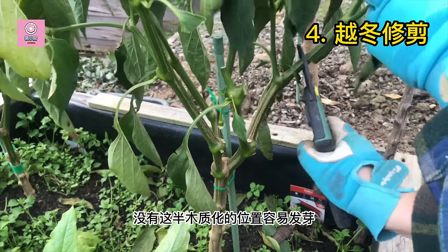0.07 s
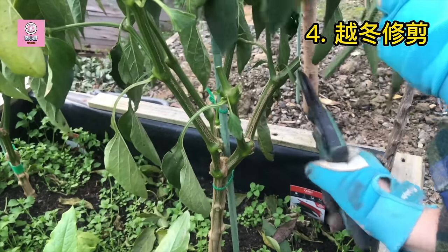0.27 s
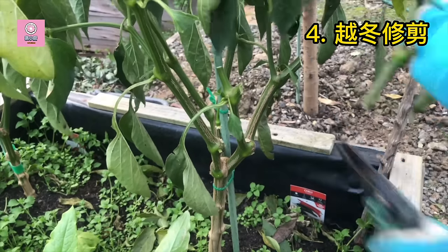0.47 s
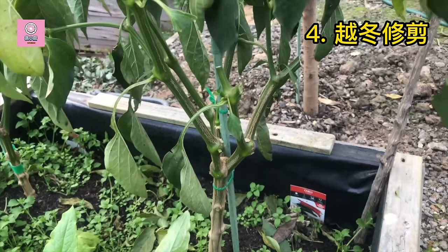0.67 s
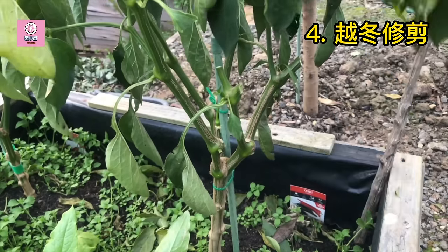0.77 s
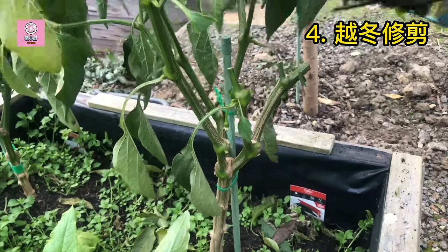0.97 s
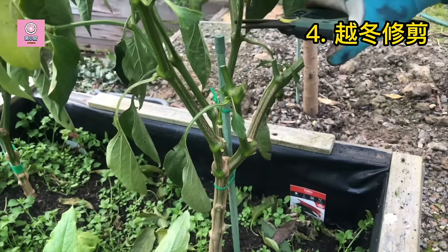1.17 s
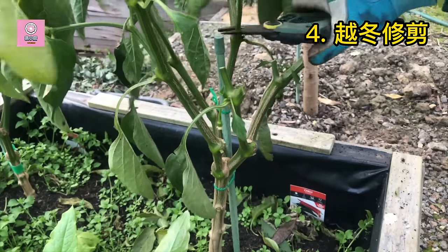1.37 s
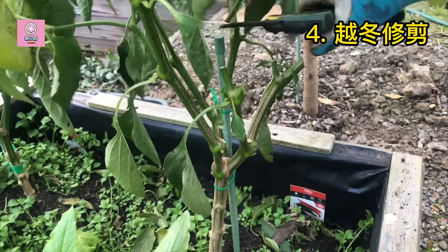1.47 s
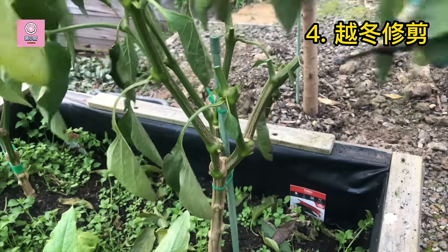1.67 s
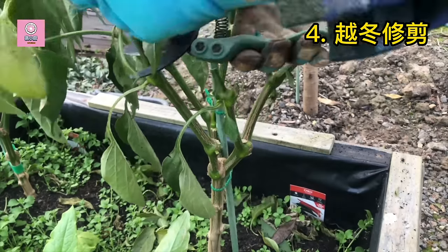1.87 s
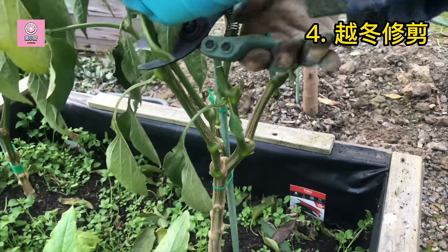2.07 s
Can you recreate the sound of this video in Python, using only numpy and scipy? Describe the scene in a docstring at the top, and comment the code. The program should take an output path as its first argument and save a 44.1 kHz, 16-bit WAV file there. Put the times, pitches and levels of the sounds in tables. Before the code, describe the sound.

Hand shears crunch and crack through a thick stem, then snip a thinner one amid light rustles

```python
"""A garden bed: hand pruning shears cut two pepper stems close to the microphone.
The blade crunches into the thick stem, fibres crack, and each stem parts with a sharp, dry snap.
Cracks are short rings plus decaying noise; crunch, ticks and rustles are grains and bursts of noise.
Leaves and a glove rustle and tick around the cuts, over a faint outdoor rumble and hiss of shaped noise."""
import sys
import numpy as np
from scipy import signal
from scipy.fft import rfft, irfft
from scipy.io import wavfile
from scipy.ndimage import map_coordinates

SR = 44100
rng = np.random.default_rng(int(sys.argv[2]) if len(sys.argv) > 2 else 0)


def master(y):
    """Save y as 16-bit WAV."""
    cut = np.clip(np.atleast_2d(y).T, -1, 1)
    pcm = np.round(cut * 32767)  # scale
    wavfile.write(sys.argv[1], SR, pcm.astype(np.int16))


N = 94021
TILT_HZ = 5500  # a tilt pivots here


def undb(db):
    """Decibels to gain."""
    return 10 ** (np.asarray(db) / 20)


def unit(x):
    """Scale to rms 1."""
    return x / np.sqrt(np.mean(x ** 2))


def fade(t, t60):
    """Exponential decay, 60 dB down after t60."""
    return np.exp(-np.log(1000) * t / t60)


def add(out, start, sound):
    """Mix a sound in at its time."""
    i = max(int(round(start * SR)), 0)
    out[i:i + len(sound)] += sound[:max(N - i, 0)]


def spectrum_db(hz, points):
    """Draw a curve through (f/Hz, level/dB) points, straight on a log frequency axis."""
    f, db = np.array(points).T
    return np.interp(np.log(hz), np.log(f), db)


def colour(x, points, tilt_db=0):
    """Causal minimum-phase filter of unit power along a spectrum, tilted per octave above 600 Hz."""
    hz = np.maximum(np.fft.rfftfreq(1024, 1 / SR), 1)
    tilt = tilt_db * np.log2(np.maximum(hz, 600) / TILT_HZ)
    gain = unit(undb(spectrum_db(hz, points) + tilt))
    # folding the cepstrum puts the filter's energy as early as possible
    cepstrum = irfft(np.log(gain))
    half = len(cepstrum) // 2
    cepstrum[1:half] *= 2
    cepstrum[half + 1:] = 0
    impulse = irfft(np.exp(rfft(cepstrum)))
    return signal.fftconvolve(x, impulse)[:len(x)]


def steady(points):
    """Even noise of rms 1 along a spectrum."""
    hz = np.maximum(np.fft.rfftfreq(N, 1 / SR), 1)
    white = rfft(rng.standard_normal(N))
    return unit(irfft(white * undb(spectrum_db(hz, points)), N))


def peak(x, hz, width):
    """Pass a sound through one resonance."""
    return signal.lfilter(*signal.iirpeak(hz, hz / width, fs=SR), x)


# splinters die fast, over a weaker and slower decay of the stem's shell
SPLINTER_T60_S, SHELL_T60_S, SHELL_DB, ECHO_T60_S = 0.01, 0.042, -6.5, 0.22
LOW_CUT_HZ = 1360  # stems and blades are too small to radiate bass
# colour of the splinters: f/Hz, level/dB
SPLINTER_COLOUR = [(200, -8), (1100, -7.5), (2200, -11), (4000, 0.5), (7500, 1), (10000, -0.5), (13000, -1),
                   (16000, -5.5)]
# colour of the garden's echo: f/Hz, level/dB
ECHO_COLOUR = [(200, -10.5), (1100, -12.5), (2000, -4.5), (2900, -3.5), (4400, -4.5), (5600, 0),
               (7300, -4.5), (9000, -9.5), (13000, -14), (16000, -15)]


def snaps(blows, modes):
    """Each blow rings its body for a few milliseconds, with splinter noise and a faint echo."""
    out, t = np.zeros(N), np.arange(SR // 4) / SR
    hz, mode_db, t60 = np.array(modes).T
    signs = (-1) ** np.arange(len(hz))
    rings = [s * np.sin(2 * np.pi * f * t) * fade(t, decay) for s, f, decay in zip(signs, hz, t60)]
    splinter_decay = fade(t, SPLINTER_T60_S) + undb(SHELL_DB) * fade(t, SHELL_T60_S)
    low_cut = signal.butter(4, LOW_CUT_HZ, "high", fs=SR, output="sos")
    for start, db, tilt_db, splinter_db, echo_db in blows:
        noise = rng.standard_normal((2, len(t)))
        ring = undb(mode_db + tilt_db * np.log2(hz / TILT_HZ)) @ np.array(rings)
        splinters = colour(noise[0] * splinter_decay, SPLINTER_COLOUR, tilt_db)
        echo = colour(noise[1] * fade(t, ECHO_T60_S), ECHO_COLOUR)
        snap = ring / np.abs(ring).max() + undb(splinter_db) * splinters + undb(echo_db) * echo
        add(out, start, undb(db) * signal.sosfilt(low_cut, snap))
    return out


# cracks of the thick stem: t/s, level/dB, tilt/(dB per octave), splinter level/dB, echo level/dB
THICK_CRACKS = [(.1357, -33.5, 7.5, -6.5, -31.5), (.1411, -36, 2.5, -11, -35),
                (.1479, -27.5, -2.5, -6.5, -34), (.1493, -20.5, 0.5, -10.5, -37.5),
                (.1522, -5.5, 0, -20.5, -44.5)]
# short rings of the thick stem: f/Hz, level/dB, t60/s
THICK_STEM_RINGS = [(2370, -7, 0.0064), (2970, -6, 0.0074), (3620, -5, .0065), (4390, -7.5, .007),
                    (5255, -6, 0.008), (6020, -12, .012), (7005, -3.5, .008), (7840, 2.5, .0042),
                    (8820, 0.5, 0.0018), (11050, -13.5, .012), (12680, -13, 0.011), (14660, -10.5, 0.0079),
                    (15400, -11.5, .008)]


def thick_stem():
    """The thick stem cracks repeatedly, each crack ringing its short modes."""
    return snaps(THICK_CRACKS, THICK_STEM_RINGS)


# cracks of the thin stem: t/s, level/dB, tilt/(dB per octave), splinter level/dB, echo level/dB
THIN_CRACKS = [(1.4169, -46, 0, -4, -45), (1.4194, -32.5, -1.2, -7.5, -30),
               (1.4250, -19, -0.35, -15, -36.5)]
# short rings of the thin stem: f/Hz, level/dB, t60/s
THIN_STEM_RINGS = [(1940, -11.5, 0.0046), (2740, -17.5, 0.019), (4470, -7, 0.0076), (5730, -3, 0.0065),
                   (6900, -2, 0.00519), (8120, -2, 0.007), (10420, -1.5, 0.0063), (11980, 1, .0038),
                   (14910, 2, 0.0055)]


def thin_stem():
    """The thin stem cracks through, ringing its own short modes."""
    return snaps(THIN_CRACKS, THIN_STEM_RINGS)


# the blades shutting: t/s, level/dB, tilt/(dB per octave), splinter level/dB, echo level/dB
SHUTS = [(1.4489, -11.5, 0.009, -20, -59)]
# short rings of the shears: f/Hz, level/dB, t60/s
SHEARS_RINGS = [(2620, -10.5, 0.002), (3210, -18.5, 0.0092), (4460, -26, 0.0022), (6610, -1, 0.0062),
                (7780, -7, 0.0025), (8850, -2, 0.0039), (10400, 5, 0.0024), (11630, -2.5, 0.0039),
                (13100, -6.5, 0.0043), (14900, -11, 0.0044)]


def shears_shut():
    """The blades clack shut after the thin stem, ringing the shears briefly."""
    return snaps(SHUTS, SHEARS_RINGS)


# the blade is jarred as the thick stem parts: t/s, level/dB
BLADE_JARS = [(.153, -43)]
# lasting rings of the steel blade: f/Hz, level/dB, t60/s
BLADE_RINGS = [(5550, 0, 0.058), (6010, -1, .05), (7640, -1, 0.052)]


def blade():
    """The steel blade rings on faintly after the thick stem gives."""
    out, t = np.zeros(N), np.arange(SR // 8) / SR
    for start, db in BLADE_JARS:
        for hz, mode_db, t60 in BLADE_RINGS:
            add(out, start, undb(db + mode_db) * np.sin(2 * np.pi * hz * t) * fade(t, t60))
    return out


JOLT_T60_S = 0.045
# the handles jolt the gloved hand: t/s, level/dB
JOLTS = [(0.1531, -51.5), (1.4251, -58), (1.45, -58.5)]
# colour of a jolt: f/Hz, level/dB
JOLT_COLOUR = [(60, -20), (170, -0.5), (350, -7.5), (600, -7), (1050, -16.5), (1600, -32), (4000, -45.5)]


def jolts():
    """A soft, low knock of the handles in the hand: decaying dark noise."""
    out, t = np.zeros(N), np.arange(SR // 8) / SR
    for start, db in JOLTS:
        knock = rng.standard_normal(len(t)) * fade(t, JOLT_T60_S)
        add(out, start, undb(db) * colour(knock, JOLT_COLOUR))
    return out


BITE_DB, BITE_TILT_DB = -57, -0.5  # level, tilt per octave
# the blade grinding in: start t/s, length/s, rise/s, fall/s
BITE = (.07, .075, .006, .015)
# fibres giving under the blade: t/s, level/dB, tilt/(dB per octave), t60/s
FIBRES = [(0.0546, -50.5, 7, 0.011), (.0625, -49.5, 3.5, 0.029), (0.0719, -45, 7, 0.0054),
          (0.0735, -42, 1.5, 0.013), (.092, -38, 1, .013), (.096, -49, 5, .02), (0.1022, -42.5, -3.5, .017),
          (.106, -44.5, -6.5, 0.022), (.1143, -49.5, 5.5, 0.011), (0.125, -48, 1.5, 0.0074)]
# colour of fibres, and of the ticks below: f/Hz, level/dB
TICK_COLOUR = [(200, -16), (800, -15.5), (1700, -2), (4000, -3.5), (8000, -1.5), (12000, -2.5), (16000, -5)]
# resonances of the blade wedged in the stem: f/Hz, width/Hz, level/dB
CRUNCH_RESONANCES = [(2350, 350, -8), (3000, 250, -4), (3550, 250, -1.5), (4600, 400, -5.5), (5550, 280, 0),
                     (7650, 300, 0), (8960, 1400, 0), (10500, 450, -2), (11800, 450, -0.5),
                     (12500, 600, -2.5), (14400, 400, 0), (15400, 700, -4.5)]


def crunch():
    """The blade grinds into the thick stem and fibres give one by one, through the same resonances."""
    out = undb(BITE_DB) * colour(friction(*BITE), TICK_COLOUR, BITE_TILT_DB)
    for start, db, tilt_db, t60 in FIBRES:
        add(out, start, undb(db) * colour(burst(t60), TICK_COLOUR, tilt_db))
    return resonate(out, CRUNCH_RESONANCES)


def resonate(x, modes):
    """Pass a sound through parallel resonances, keeping its level."""
    rung = sum(undb(db) * peak(x, hz, width) for hz, width, db in modes)
    return unit(rung) * x.std()


TICK_RISE_S = 0.0006


def burst(t60):
    """A tiny dry noise burst with a fast rise and an exponential fall."""
    t = np.arange(SR // 16) / SR
    rise = np.minimum(t / TICK_RISE_S, 1)
    return rng.standard_normal(len(t)) * rise * fade(np.maximum(t - TICK_RISE_S, 0), t60)


TICK_RING_WIDTH_HZ, TICK_RING_GAIN = 660, 1.43  # gain is linear, against the plain burst
# small ticks of twigs and leaves: t/s, level/dB, tilt/(dB per octave), t60/s, resonance f/Hz
TICKS = [(0.255, -61, -5.5, 0.018, 3500), (0.282, -64, -4, 0.023, 1930), (.3460, -57.5, -4, 0.0095, 6200),
         (.6180, -59.5, -6.5, 0.024, 2090), (0.679, -57, -4, 0.051, 4760), (0.715, -61.5, -10, 0.03, 3100),
         (0.729, -54.5, -7, 0.021, 2870), (0.7654, -53.5, -3.5, 0.038, 5000), (0.846, -49, 5, 0.044, 5400),
         (0.857, -54.5, -2.5, .025, 4600), (0.870, -46.5, 2, 0.026, 8740), (0.907, -56, 5, .014, 5960),
         (.922, -51, 5, 0.031, 8800), (0.999, -60, 4, .015, 10100), (1.016, -60.5, -3, 0.011, 2690),
         (1.374, -49, 1.5, 0.023, 13100), (1.3872, -56, 1.5, 0.025, 4500), (1.4, -51, 1, 0.0067, 11400),
         (1.409, -54, 1, 0.03, 4400), (1.567, -53.5, 1.5, .015, 7400), (1.573, -57, 0, 0.013, 5500),
         (1.591, -46, 5, 0.012, 13400), (1.5945, -48.5, 0.5, 0.0079, 4200), (1.601, -52, -3, 0.012, 7000),
         (1.611, -55.5, -5, 0.02, 2440), (1.615, -56.5, -3, 0.02, 6700), (1.637, -50.5, -1, 0.016, 3500),
         (1.684, -59.5, -4, .012, 9800), (1.705, -56, 3, 0.015, 5000), (1.743, -57, -1.5, 0.022, 7200),
         (1.753, -57, 0, 0.026, 7700), (1.777, -58, 2, 0.023, 11100), (1.989, -46, 2.5, .012, 10000),
         (2.015, -60.5, 1, 0.02, 10000), (2.027, -49, 1.5, 0.022, 11700), (2.039, -53, 5, 0.013, 10200),
         (2.0519, -49, -3.5, 0.011, 5630), (2.081, -62.5, -10, 0.03, 2270)]


def ticks():
    """Tiny dry bursts as twigs and leaves touch the blades, each with its own resonance."""
    out = np.zeros(N)
    for start, db, tilt_db, t60, hz in TICKS:
        touch = burst(t60)
        ringing = touch + TICK_RING_GAIN * peak(touch, hz, TICK_RING_WIDTH_HZ)
        level_kept = unit(ringing) * touch.std()
        add(out, start, undb(db) * colour(level_kept, TICK_COLOUR, tilt_db))
    return out


# leaves and glove brushing: start t/s, length/s, level/dB, tilt/(dB per octave), rise/s, fall/s
RUSTLES = [(0, 0.15, -60, -7.5, 0.00058, 0.035), (0.2, 0.38, -74, -4, 0.018, 0.16),
           (0.48, 0.31, -66, -3, 0.064, 0.082), (0.807, 0.056, -62.5, -0.5, 0.0076, 0.096),
           (0.841, 0.087, -56, 0.5, 0.01, 0.04), (0.952, 0.2, -74.5, -1.5, 0.012, 0.073),
           (1.456, 0.13, -64, 0, 0.027, 0.048), (1.546, 0.045, -58, 0.5, 0.028, 0.022),
           (1.574, 0.19, -67.5, -2, 0.012, .08), (1.798, .18, -78.5, -4.5, 0.015, 0.16),
           (2.041, 0.047, -63, 1.5, 0.022, 0.1)]
# colour of leaves: f/Hz, level/dB
LEAF_COLOUR = [(200, -7), (700, -7), (1800, -1), (3300, -0.5), (4300, -0.5), (5700, 0.5), (7000, -1),
               (8600, 0), (12000, 1.5), (16000, -1.5)]


def rustles():
    """Leaves brush the glove and each other: swells of leaf-coloured friction."""
    out = np.zeros(N)
    for start, length, db, tilt_db, rise, fall in RUSTLES:
        out += undb(db) * colour(friction(start, length, rise, fall), LEAF_COLOUR, tilt_db)
    return out


GRAINS_PER_S, GRAIN_DROP_DB = 1900, -1.5  # most grains fall below full size by about this much
RUB_SHARE, FLECK_SHARE = 0.6, 0.5  # linear, against the grains
FLUTTER_PER_S, FLUTTER_DB = 130, 0.854  # random level points, and their spread


def friction(start, length, rise, fall):
    """Dense uneven grains and flecks over smooth rubbing, swelling and dying away (17 dB per fall)."""
    t = np.arange(N) / SR
    sizes = undb(GRAIN_DROP_DB * np.minimum(rng.exponential(size=N), 5))
    struck = rng.random(N) < GRAINS_PER_S / SR
    grains = unit(struck * sizes * np.sign(rng.standard_normal(N)))
    rubbing = grains + FLECK_SHARE * flecks() + RUB_SHARE * rng.standard_normal(N)
    contact = unit(rubbing * undb(FLUTTER_DB * wander(FLUTTER_PER_S)))
    swell = np.clip((t - start) / rise, 0, 1)
    return contact * swell * np.exp(-2 * np.maximum(t - start - length, 0) / fall)


def wander(rate):
    """Random wander: straight lines between normal random points, at a rate per second."""
    return map_coordinates(rng.standard_normal(N), [np.arange(N) * rate / SR], order=1, mode="mirror")


FLECKS_PER_S, FLECK_T60_S = 900, 0.005
FLECK_LOW_HZ, FLECK_HIGH_HZ = 3800, 15500


def flecks():
    """Crisp edges flick at random, each ringing for a moment at its own pitch."""
    out, t = np.zeros(N), np.arange(SR // 100) / SR
    for when, pitch, size in rng.random((int(FLECKS_PER_S * N / SR), 3)):
        hz = FLECK_LOW_HZ * (FLECK_HIGH_HZ / FLECK_LOW_HZ) ** pitch
        add(out, when * N / SR, size ** 2 * np.sin(2 * np.pi * hz * t) * fade(t, FLECK_T60_S))
    return unit(out)


# brief narrow scrapes of stalks: middle t/s, length/s, centre f/Hz, width/Hz, level/dB
SCRAPES = [(0.256, 0.018, 3500, 1300, -63), (0.717, 0.015, 3050, 600, -64), (1.352, 0.032, 3260, 455, -69)]


def scrapes():
    """A stalk slides briefly and excites one narrow resonance, under a bell-shaped swell."""
    out, t = np.zeros(N), np.arange(N) / SR
    for when, length, hz, width, db in SCRAPES:
        rub = unit(peak(rng.standard_normal(N), hz, width))
        out += undb(db) * rub * np.exp(-(2 * (t - when) / length) ** 2 / 2)
    return out


SPLIT_HZ = 126.7  # between the two parts of the rumble
HISS_DB = -74.5
# colour of the distant rumble: f/Hz, level/dB
RUMBLE_COLOUR = [(20, -35), (38, -31), (52, -8.5), (72, 1.5), (105, -7.5), (140, -9), (200, -9.5),
                 (270, -13.5), (360, -23), (700, -27.5), (1500, -38.5), (4000, -52)]
# drift of the rumble: t/s, pitch factor
RUMBLE_DRIFT = [(0, 0.97), (.43, 1.03), (.79, 1.01), (0.961, 1.12), (1.05, 1.27), (1.81, 1.3),
                (1.889, 1.084), (2.13, 0.97)]
# level of the rumble's bass: t/s, level/dB
BASS_LEVEL = [(0, -64.5), (.06, -63.5), (.26, -57.5), (.31, -65), (.55, -56), (.65, -64), (.72, -54),
              (.78, -62.5), (.89, -62.5), (.96, -58.5), (1.02, -65.5), (1.1, -61), (1.49, -59.5),
              (1.56, -60), (1.64, -67.5), (1.75, -56.5), (1.82, -55.5), (1.89, -67), (2.04, -63),
              (2.13, -60)]
# level of the rumble's upper part: t/s, level/dB
LOW_MID_LEVEL = [(0, -62.5), (.17, -60.5), (.24, -68), (.34, -64), (.52, -68.5), (.7, -64), (.78, -64),
                 (1.04, -64), (1.55, -64), (1.62, -62.5), (1.85, -65.5), (2.13, -62.5)]
# colour of the hiss: f/Hz, level/dB
HISS_COLOUR = [(300, -13.5), (1200, -0.5), (3000, -5), (6000, -8), (10000, -9.5), (16000, -12)]


def garden():
    """A distant rumble that surges and rises in pitch for a while, under a thin even hiss."""
    t = np.arange(N) / SR
    # reading the noise faster raises its pitch
    place = np.cumsum(np.interp(t, *np.array(RUMBLE_DRIFT).T))
    rumble = map_coordinates(steady(RUMBLE_COLOUR), [place], order=1, mode="mirror")
    low_pass = signal.butter(4, SPLIT_HZ, fs=SR, output="sos")
    bass = signal.sosfiltfilt(low_pass, rumble, padtype="even")
    surges = np.zeros(N)
    for band, curve in ((bass, BASS_LEVEL), (rumble - bass, LOW_MID_LEVEL)):
        surges += unit(band) * undb(np.interp(t, *np.array(curve).T))
    return surges + undb(HISS_DB) * steady(HISS_COLOUR)


def scene():
    """Shears, plant and garden at one microphone."""
    cuts = thick_stem() + thin_stem() + shears_shut() + blade() + jolts()
    foliage = ticks() + rustles() + scrapes()
    return (cuts + crunch() + foliage + garden())[None]


TOP_HZ = 16100


def record(dry):
    """The recorder cuts the top with a steep low-pass."""
    return signal.sosfilt(signal.ellip(8, .2, 70, TOP_HZ, fs=SR, output="sos"), dry)


dry = scene()
out = record(dry)
master(out)
```